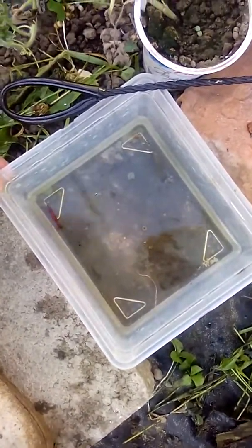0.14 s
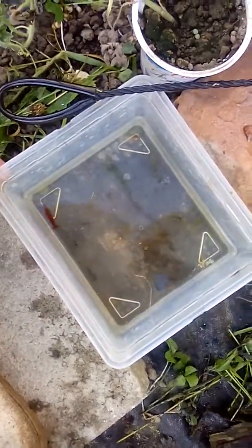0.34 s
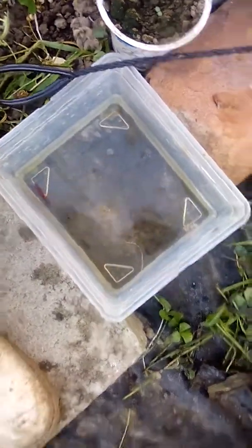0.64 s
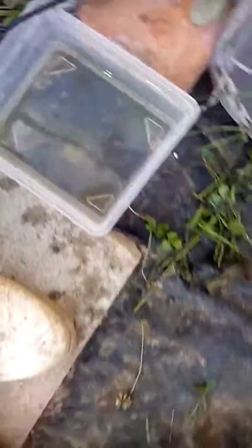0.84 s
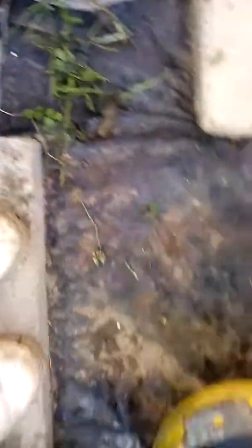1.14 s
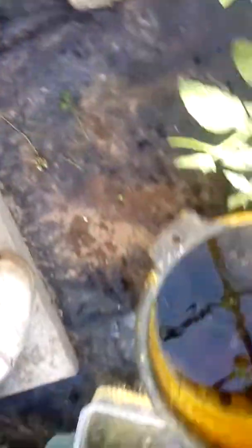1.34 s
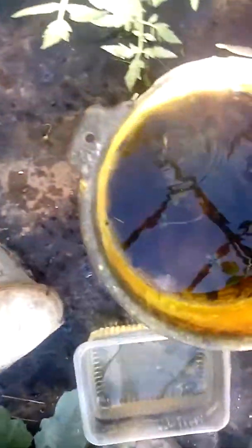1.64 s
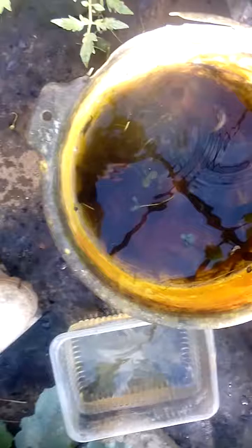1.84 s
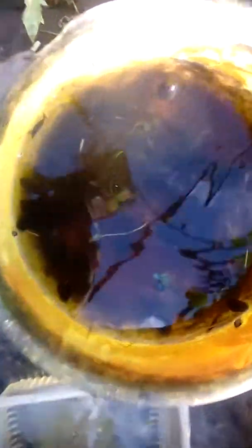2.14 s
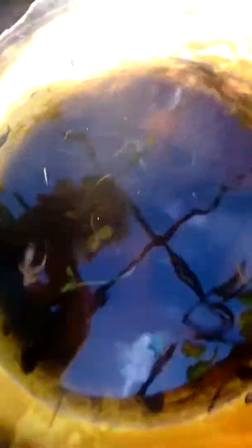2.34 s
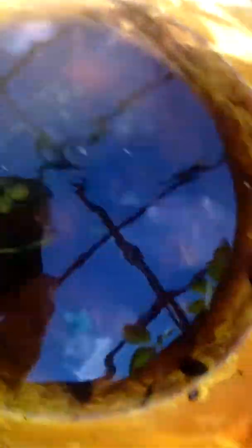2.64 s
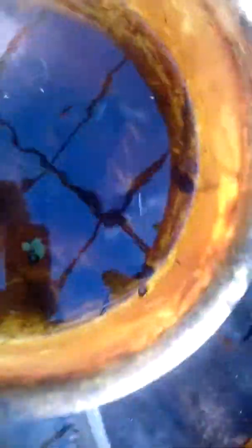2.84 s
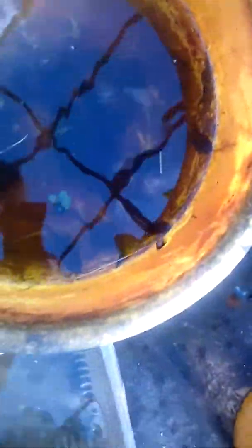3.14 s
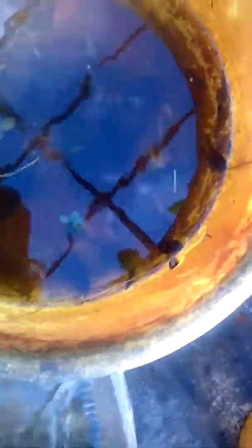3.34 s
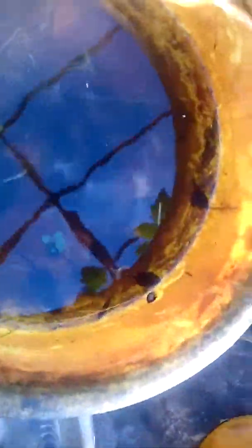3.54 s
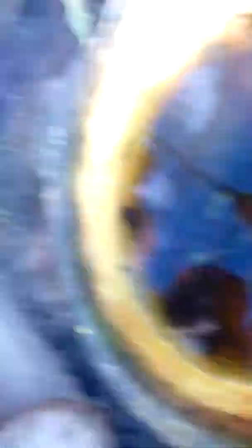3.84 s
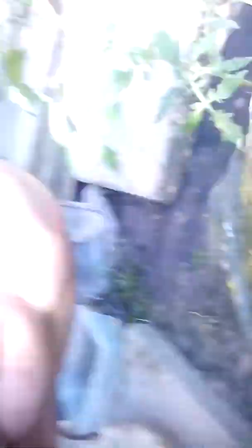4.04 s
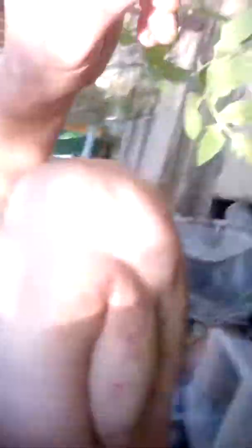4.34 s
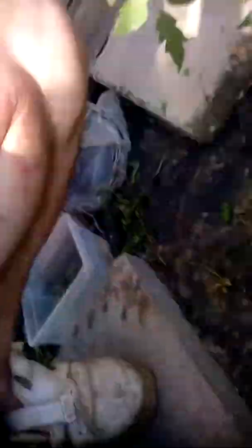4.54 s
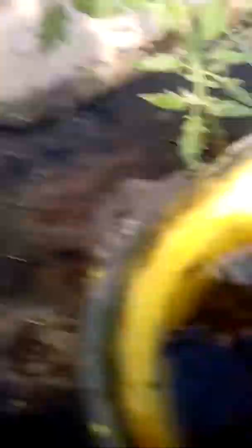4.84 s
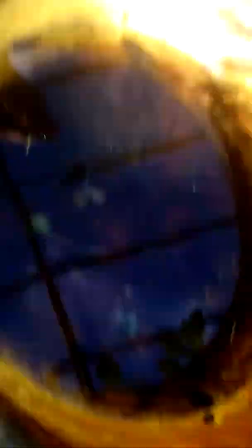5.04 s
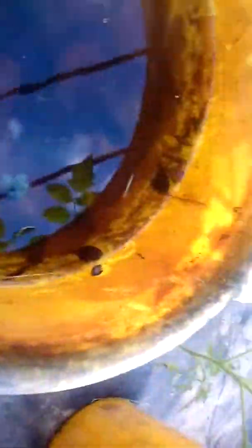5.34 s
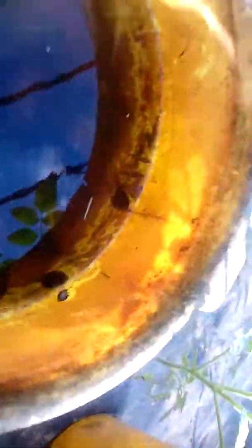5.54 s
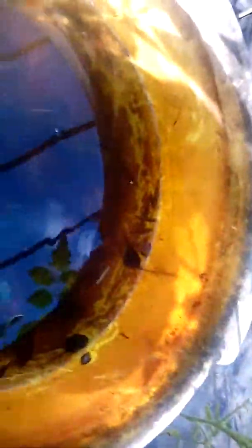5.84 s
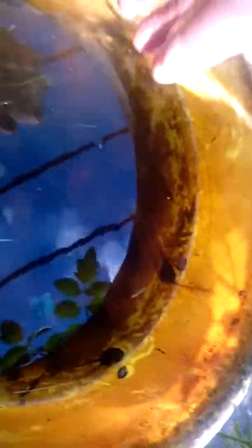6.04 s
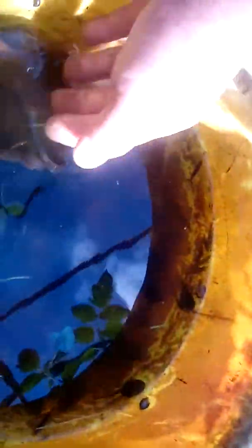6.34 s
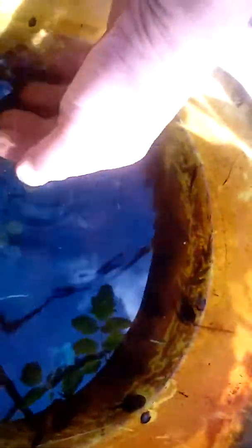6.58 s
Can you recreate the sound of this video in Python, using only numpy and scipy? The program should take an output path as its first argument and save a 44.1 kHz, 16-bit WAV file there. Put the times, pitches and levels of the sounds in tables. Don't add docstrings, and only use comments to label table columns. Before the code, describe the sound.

A quiet garden on a hand-held phone: very soft breeze rumble and distant road hiss. After about a second and a half, low handling thuds, plastic knocks and gritty scuffs begin. A single loud, dry plastic snap stands far above everything, followed by crunching grit and a brief hollow rubbed note. After a lull, another burst of grinding grit, then faint drags fade into the hushed air.

```python
import sys
import numpy as np
from scipy import signal
from scipy.fft import rfft, irfft, next_fast_len
from scipy.io import wavfile
from scipy.ndimage import uniform_filter1d, map_coordinates

SR = 44100
rng = np.random.default_rng(int(sys.argv[2]) if len(sys.argv) > 2 else 0)


def makeup_ratio(level_db):
    decades = np.asarray(level_db, float) / 20
    return 10 ** decades


def wrap_up_sound(samples):
    columns = np.atleast_2d(samples).T
    tamed = np.clip(columns, -1, 1)
    steps = np.round(tamed * 32767).astype(np.int16)
    wavfile.write(sys.argv[1], SR, steps)


N = 295911

# time_s, breeze_db, road_db
AIR_LEVELS = [(0, -65, -61.5), (.3, -64, -64.5), (.55, -64, -65.5), (.75, -65, -68.5), (1.0, -62.5, -65.5),
              (1.12, -66.5, -69), (1.45, -62.5, -73), (2.3, -64.5, -66.5), (2.7, -64, -76),
              (3.27, -67, -70.5), (3.5, -64.5, -74), (4.0, -62.5, -65.5), (4.7, -67.5, -68),
              (4.948, -63.5, -67), (5.3, -66, -73), (5.9, -65, -74.5), (6.3, -66, -74), (6.71, -64, -71)]
# freq_hz, density_db
BREEZE_SPECTRUM = [(15, -42), (25, -6), (112, 0.5), (233, -3.5), (297, -6), (419, -9.5), (518, -13.5),
                   (600, -12), (780, -50.5), (1320, -120)]
# freq_hz, density_db
ROAD_SPECTRUM = [(350, -48), (600, -16.5), (901, -4), (1020, -1), (1200, -5.5), (1360, -0.5), (1640, -2),
                 (2190, -8), (2800, -27), (3640, -55), (6160, -120)]
# freq_hz, density_db
HISS_SPECTRUM = [(240, -30.5), (400, -10), (488, -18.5), (653, -4.5), (1100, -13), (1970, -23),
                 (2360, -13.5), (5830, -14), (7920, -27.5), (15500, -33.5)]
# peak_s, level_db, swell_s, fade_s, centre_hz
GUST_STROKES = [(.35, -65, 0.11, 0.11, 69.6), (.43, -64, 0.16, 0.079, 337), (.55, -61.5, .12, 0.13, 98),
                (.7, -62.5, 0.16, 0.13, 348), (.87, -62, 0.096, 0.074, 129), (.92, -62, 0.16, 0.25, 289),
                (1.01, -59.5, 0.084, 0.083, 108), (1.33, -62.5, 0.064, 0.18, 100),
                (1.62, -52, 0.093, 0.11, 274), (1.75, -52.5, 0.12, 0.14, 145),
                (1.76, -52.5, 0.13, 0.13, 280), (1.88, -61, 0.09, 0.053, 89.6),
                (1.93, -57.5, 0.16, 0.14, 265), (2.25, -60, 0.1, 0.11, 110), (2.32, -64.5, 0.78, 0.35, 244),
                (2.9, -58, 0.16, 0.12, 340), (2.93, -55.5, 0.14, 0.18, 127), (3.08, -55.5, 0.09, 0.13, 184),
                (3.1, -57.5, 0.096, 0.098, 370), (3.2, -63, 0.087, 0.099, 131),
                (3.45, -65.5, .12, .15, 119), (3.5, -69.5, 0.46, 0.28, 335), (3.76, -59, 0.1, 0.096, 129.5),
                (3.8, -60, 0.069, .1, 50), (4.03, -61, 0.044, 0.056, 301), (4.16, -58.5, 0.21, 0.12, 120.3),
                (4.33, -57, .06, 0.28, 162), (4.44, -58, 0.15, 0.12, 142), (4.55, -56.5, 0.085, 0.1, 121),
                (4.55, -60, 0.32, 0.11, 394), (4.85, -64.5, 0.11, 0.14, 234), (4.92, -59, 0.16, 0.2, 77),
                (5.15, -61.5, 0.12, 0.077, 153), (5.35, -58.5, 0.12, 0.074, 156),
                (5.55, -62.5, 0.083, 0.21, 127.5), (5.87, -61, 0.18, 0.15, 140),
                (6.13, -69.5, 0.081, 0.1, 329.4), (6.5, -69.5, 0.3, 0.27, 90.2)]
# start_s, peak_db, swing_hz, t60_s
CASE_THUDS = [(1.5238, -32.5, 91, 0.075), (1.5538, -27, 87.3, 0.095), (1.571, -27.5, 84.5, 0.056),
              (1.6715, -37.5, 73, 0.093), (2.854, -40.5, 75, 0.11), (3.668, -52, 91, 0.093),
              (3.682, -44, 91, 0.052), (4.021, -39.5, 106, 0.027), (4.103, -47, 120, 0.021),
              (5.046, -50, 67, 0.064), (5.128, -49.5, 78.4, 0.055), (5.503, -52.5, 129, 0.088),
              (5.628, -52, 119, 0.067)]
# freq_hz, t60_s
YARD_DECAY = [(300, 0.16), (1500, 0.038), (5000, 0.065), (10000, 0.026)]
# freq_hz, gain_db
CAPSULE_RESPONSE = [(60, -34.5), (440, -1), (6800, -0.5), (7500, -18.5), (8200, -21), (15200, -37),
                    (15700, -90)]
# start_s, peak_db, ring_hz, t60_s, crack_db
PLASTIC_KNOCKS = [(1.521, -43.5, 1560, .0053, -18), (1.604, -41.5, 2080, 0.013, -11),
                  (1.6005, -38.5, 623, 0.01, -17.5), (1.709, -29.5, 612, 0.012, -25),
                  (1.75, -45, 502, 0.016, -20), (1.7849, -24, 2280, 0.0022, -21),
                  (1.7846, -29, 930, 0.003, -20), (1.8832, -31.5, 2300, 0.0031, -28),
                  (1.883, -45, 980, 0.0086, -30), (2.107, -32.5, 624, 0.023, -2),
                  (2.115, -44.5, 615, 0.0068, -12), (2.566, -48, 4620, .0036, -20),
                  (2.9129, -26, 3300, 0.0012, -22), (3.0721, -35, 970, 0.019, -17),
                  (3.126, -52, 4700, .006, -20), (3.656, -46, 2330, .015, -25),
                  (3.775, -51, 630, 0.0071, -25), (3.776, -48.5, 2680, 0.0036, -25),
                  (4.016, -39, 2350, 0.0071, -25), (3.657, -49.5, 1550, 0.014, -11),
                  (3.775, -36.5, 1657, 0.0087, -49), (4.406, -35, 660, 0.0061, -3),
                  (4.864, -42.5, 2920, 0.0041, -19), (4.932, -50, 2680, .006, -19),
                  (4.954, -47, 2300, .003, -8), (4.966, -41, 2210, 0.0016, -16),
                  (2.573, -52, 4470, 0.0035, -10), (2.58, -49, 4420, 0.0033, -14.5),
                  (2.615, -53, 5910, .004, -1), (4.3263, -40.5, 1330, .008, -20)]
# start_s, peak_db, ring_hz,
# crack_db, spark_db
STONE_POPS = [(1.959, -43, 5970, -9, -44), (1.958, -44, 1490, -8, -45), (2.107, -38, 5600, 4, -28),
              (2.114, -36, 5800, -2, -29), (2.761, -40, 4660, -30, -18), (2.872, -41, 4020, -12, -26),
              (2.952, -50, 6700, -3, -25), (3.036, -56, 6770, -5, -22), (3.073, -48, 6070, 1, -21),
              (3.406, -60, 2000, -1.5, -19.5), (4.3583, -37.5, 3190, -13.5, -35),
              (4.418, -33, 3000, 0, -35.5), (4.486, -39, 2980, -3, -23), (4.4986, -34, 3340, -5, -22),
              (5.222, -53, 6730, -7, -20), (5.583, -62, 4960, 3, -32), (2.096, -29, 795, -1, -28.5),
              (2.862, -46, 3000, -3, -23), (2.9, -37, 1230, -8, -32), (2.928, -27, 3630, -11.5, -37),
              (2.9795, -49, 3810, -5, -27), (2.999, -44.5, 3470, -1, -24), (3.101, -40, 3920, 1, -35),
              (4.016, -34.5, 1650, -8, -21), (4.185, -55, 1720, -1, -15), (4.294, -49, 3060, -12, -35),
              (4.3263, -32.5, 3050, -1.5, -24), (4.337, -34.5, 1870, -18, -37),
              (4.3695, -35.5, 3080, -17, -26), (4.4105, -28.5, 3200, -10, -31),
              (4.4207, -28.5, 2730, -7, -32), (4.421, -29, 4860, -10, -30), (4.495, -33, 4240, -12, -25),
              (4.502, -30.5, 4220, -9, -31), (4.523, -38, 2744, -17, -26), (4.536, -30.5, 2896, -12, -31)]
# start_s, peak_db
SNAP_BLOWS = [
    (2.76232, -4),
    (2.7645, -24),
    (2.7748, -26),
]
# mode_hz, level_db, t60_s
SHELL_MODES = [(1480, 0, .0021), (3500, -28, .005), (4180, -18, .003), (5140, -15.5, .0025),
               (5640, -19, .004), (6160, -17.5, .0025)]
# centre_s, level_db, half_length_s, first_hz, last_hz
GLIDE_STROKES = [(0.06, -62.5, .35, 1587, 1725), (0.09, -63, 0.2, 1410, 1280),
                 (0.378, -65.5, 0.28, 980, 1090), (0.374, -69, .2, 1920, 2100),
                 (0.553, -69, 0.19, 1640, 1570), (0.677, -70, 0.41, 1055, 1190),
                 (0.834, -67.5, 0.19, 1870, 2460), (0.996, -72.5, 0.2, 1690, 1590),
                 (0.987, -66.5, 0.078, 1140, 1080), (2.274, -71.5, 0.18, 980, 1050),
                 (2.373, -61, 0.043, 1180, 1000), (2.384, -77, 0.22, 2240, 2380),
                 (2.72, -68, .2, 1737, 1890), (3.47, -71.5, 0.093, 1750, 1700),
                 (3.673, -70, .18, 2150, 2280), (3.677, -66, 0.094, 1520, 1580),
                 (3.824, -68, .3, 2460, 2020), (3.97, -69, 0.084, 1010, 1110),
                 (4.09, -60.5, 0.12, 1490, 1670), (4.143, -80, 0.18, 2174, 1800),
                 (4.2, -71, 0.27, 1740, 1670), (4.197, -69, 0.2, 820, 815), (4.843, -68, 0.13, 1440, 1740),
                 (4.877, -69.5, 0.24, 890, 990), (4.942, -67, 0.13, 3070, 2650),
                 (5, -65.5, 0.14, 2270, 1850), (5.077, -64.5, 0.12, 780, 590), (5.142, -65, 0.11, 600, 790),
                 (5.29, -68, 0.097, 2340, 2190), (5.292, -69, 0.14, 1750, 1684),
                 (5.926, -72.5, 0.11, 2110, 2260), (2.426, -66, .09, 544, 504),
                 (2.53, -62, 0.081, 343, 326), (3.083, -54, 0.069, 441, 424),
                 (1.997, -44, 0.067, 1490, 1970), (3.642, -67, 0.032, 7300, 7900)]
# peak_s, level_db, swell_s,
# fade_s, note_hz
HOLLOW_STROKES = [
    (3.056, -52, .012, 0.095, 980),
    (3.08, -48, 0.032, 0.049, 977),
    (3.1095, -46, 0.047, 0.0062, 970),
    (5.076, -62, 0.17, 0.057, 7340),
    (2.113, -69.5, .03, .012, 14500),
    (4.497, -71, .02, .07, 14300),
    (5.585, -81, .04, .04, 12800),
    (2.875, -72, .015, .06, 8600),
]
# peak_s, level_db, swell_s, fade_s, low_resonance_hz
SOLE_TREADS = [(1.565, -49, 0.081, 0.088, 800), (1.605, -48, 0.014, 0.065, 636),
               (1.716, -44.5, 0.011, 0.049, 610), (1.775, -54.5, 0.11, 0.023, 604),
               (1.794, -50.5, 0.016, 0.17, 810), (1.882, -51.5, 0.043, 0.12, 970),
               (1.9605, -44, .004, 0.18, 720), (2.014, -40, 0.1, 0.17, 695),
               (2.113, -44, 0.058, 0.013, 640), (2.153, -46, 0.13, 0.061, 640),
               (2.745, -60.5, 0.15, 0.045, 940), (2.772, -47, 0.016, 0.14, 1070),
               (2.929, -45.5, 0.09, 0.078, 1100), (3.062, -47, 0.022, 0.14, 1000),
               (3.105, -47, 0.15, .014, 980), (4.03, -55, 0.12, 0.13, 1050),
               (4.326, -46, 0.008, 0.077, 1240), (4.385, -49, 0.076, 0.12, 764),
               (4.428, -44.5, 0.14, 0.16, 695), (4.5, -48, 0.13, 0.12, 760)]
# peak_s, level_db, swell_s, fade_s, high_resonance_hz
SOLE_DRAGS = [(1.406, -62, 0.13, 0.16, 1640), (1.66, -68, .05, 0.072, 1900),
              (2.57, -63.5, 0.014, 0.056, 1750), (3.2, -77, 0.13, .12, 1580),
              (3.657, -67, 0.022, 0.062, 2290), (3.93, -66, 0.15, 0.18, 1900), (4.15, -70, 0.57, 0.2, 1560),
              (4.86, -62, 0.14, 0.17, 1620), (4.95, -61.5, 0.18, 0.3, 1750), (5.3, -64.5, 0.2, 0.077, 2180),
              (5.588, -70.5, 0.094, 0.087, 1772), (5.92, -67, 0.24, 0.093, 2110),
              (6.55, -70.5, .12, 0.13, 1806)]
# peak_s, level_db, swell_s, fade_s, resonance_hz
GRIT_CRUNCHES = [(1.565, -59, 0.087, 0.047, 4970), (1.606, -57, 0.0063, 0.08, 4760),
                 (1.716, -58, .01, 0.16, 4890), (1.792, -60.5, 0.014, 0.062, 4700),
                 (1.89, -67.5, 0.056, 0.12, 5870), (1.96, -52, .004, 0.25, 5260),
                 (2.003, -48, .05, .1, 5200), (2.04, -41, 0.083, 0.08, 5700), (2.1, -46, .025, 0.068, 5670),
                 (2.114, -52, .03, .012, 5600), (2.154, -50.5, .08, 0.053, 5460),
                 (2.772, -54.5, .012, 0.12, 4360), (2.866, -57, .015, .1, 3790),
                 (2.926, -46.5, 0.071, 0.099, 3820), (3.01, -57.5, .1, 0.062, 3680),
                 (3.084, -51, 0.074, 0.1, 5430), (4.028, -66.5, .012, 0.26, 3910),
                 (4.305, -63, 0.035, 0.046, 3080), (4.34, -50.5, .04, 0.14, 3280),
                 (4.428, -45.5, 0.13, 0.12, 3720), (4.5, -44, 0.032, 0.084, 3960),
                 (4.6, -66, .1, 0.12, 3720)]
# peak_s, level_db, swell_s, fade_s, resonance_hz
GRIT_SWEEPS = [(1.43, -69, .1, 0.12, 3980), (2.568, -65, .012, 0.12, 4700), (2.67, -62, 0.088, 0.2, 5740),
               (3.2, -75, .1, 0.39, 4740), (3.66, -70.5, .04, 0.086, 5100), (4.19, -77, 0.16, .2, 4500),
               (4.868, -61.5, 0.007, 0.12, 2700), (4.96, -72, 0.12, 0.085, 3010),
               (4.93, -69.5, 0.18, .35, 6500), (5.092, -63.5, 0.18, 0.036, 7260),
               (5.252, -57.5, 0.11, 0.1, 7160), (5.308, -64, 0.039, 0.093, 6680),
               (5.588, -68, 0.041, 0.05, 4850), (5.93, -75, 0.1, 0.13, 4610)]
# peak_s, level_db, swell_s, fade_s
DUST_PUFFS = [(1.73, -72, .03, .015), (2.003, -64, 0.061, .1), (2.045, -54, 0.06, 0.059),
              (2.098, -68, .02, 0.12), (2.772, -80, .012, .06), (2.926, -63, 0.077, 0.045),
              (3.084, -70, 0.063, .06), (3.252, -80, 0.057, 0.022), (3.65, -70, 0.05, 0.027),
              (4.028, -78, .012, 0.1), (4.192, -73, .045, 0.073), (4.325, -72, 0.0091, .15),
              (4.428, -61.5, 0.12, 0.11), (4.5, -56, 0.036, 0.093), (4.87, -76.5, 0.12, .06),
              (4.93, -72, 0.22, 0.11), (5.08, -74, 0.28, .06), (5.252, -56, 0.088, 0.059),
              (5.308, -60, 0.036, 0.072), (5.588, -80.5, .04, 0.058), (5.93, -79.5, 0.22, 0.094)]
# freq_hz, density_db
DUST_SPECTRUM = [(4410, -23.5), (7500, 2), (8000, -8.5), (8900, -16), (11000, -8), (13100, -22.5),
                 (15500, -22.5)]

SOLE_LOW_HZ, SOLE_HIGH_HZ = 790, 1750
KNOCK_SPARK_DB, POP_T60_S = -56, 0.0039
STROKE_DB, STROKE_CURL = 20, 1.11


def unit(x):
    return x / np.sqrt(np.mean(np.abs(x) ** 2) + 1e-20)


def along(points, hz):
    f, v = np.transpose(points)
    return np.interp(np.log(hz + 1), np.log(f + 1), v)


def wobble(rate_hz):
    knots = rng.standard_normal(int(N * rate_hz / SR) + 4)
    return map_coordinates(knots, [np.arange(N) * rate_hz / SR])


def filtered(x, response):
    m = next_fast_len(N + SR // 2)
    return irfft(rfft(x, m) * response(np.fft.rfftfreq(m, 1 / SR)), m)[:N]


def patches(shape, bins, frames, patchy_db):
    rough = uniform_filter1d(rng.standard_normal(shape), bins, 0)
    return makeup_ratio(patchy_db * unit(uniform_filter1d(rough, frames, 1)))


def rush(spectrum, patchy_db):
    z = signal.stft(rng.standard_normal(N), SR, nperseg=1024)[2]
    z = z * patches(z.shape, bins=5, frames=12, patchy_db=patchy_db)
    x = signal.istft(z, nperseg=1024)[1][:N]
    return unit(filtered(x, lambda hz: makeup_ratio(along(spectrum, hz))))


def add(track, start_s, sound):
    part = track[round(start_s * SR):][:len(sound)]
    part += sound[:len(part)]


def ring(hz, t60_s, rise_cycles, t, order=1):
    rise = (1 - np.exp(-t * hz / rise_cycles)) ** order
    x = np.sin(2 * np.pi * hz * t) * makeup_ratio(-60 * t / t60_s) * rise
    return x / np.abs(x).max()


def hump(hz, centre_hz, octaves, db):
    return makeup_ratio(db) / (1 + (np.log2(hz / centre_hz) / octaves) ** 2)


def strokes(rows, t):
    peak_s, level_db, swell_s, fade_s = np.array(rows).T[:4, :, None]
    away = np.maximum((peak_s - t) / swell_s, (t - peak_s) / fade_s)
    return makeup_ratio(level_db - STROKE_DB * away ** STROKE_CURL) + 1e-9


def together(gains):
    return np.sqrt(np.sum(gains ** 2, axis=0))


def sliding(gains_of, notes_of, octaves, size):
    overlap = size * 3 // 4
    hz, t, z = signal.stft(rng.standard_normal(N), SR, nperseg=size, noverlap=overlap)
    hz = hz[:, None] + 1
    power = np.zeros(z.shape)
    for gain, note_hz in zip(gains_of(t), notes_of(t)):
        near = gain > 1e-6
        shape = hump(hz, note_hz[near], octaves, 0) ** 4
        power[:, near] += shape / shape.mean(0) * gain[near] ** 2
    broken = patches(z.shape, bins=4, frames=6, patchy_db=2.5)
    return signal.istft(z * np.sqrt(power) * broken, SR, nperseg=size, noverlap=overlap)[1][:N]


def garden():
    time_s, breeze_db, road_db = np.transpose(AIR_LEVELS)
    t = np.arange(N) / SR
    breeze_gain = makeup_ratio(np.interp(t, time_s, breeze_db) - 1.5 + 1.2 * wobble(8.1))
    road_gain = makeup_ratio(np.interp(t, time_s, road_db) - 1.5 + 1.3 * wobble(6))
    hiss_gain = makeup_ratio(-73 + wobble(5.4))
    breeze = breeze_gain * rush(BREEZE_SPECTRUM, patchy_db=2.5)
    road = road_gain * rush(ROAD_SPECTRUM, patchy_db=2.2)
    return breeze + road + hiss_gain * rush(HISS_SPECTRUM, patchy_db=1.2)


def gusts():
    def centres_of(t):
        return [row[4] + 0 * t for row in GUST_STROKES]
    return sliding(lambda t: strokes(GUST_STROKES, t), centres_of, octaves=.7, size=2048)


def thuds():
    out, t = np.zeros(N), np.arange(SR // 5) / SR
    for start_s, peak_db, hz, t60_s in CASE_THUDS:
        add(out, start_s, makeup_ratio(peak_db) * ring(hz, t60_s, 0.19, t))
    return out


def glides():
    rows = [(s, db, half_s, half_s) for s, db, half_s, *_ in GLIDE_STROKES]

    def notes_of(t):
        return [np.interp(t, [s - half_s, s + half_s], [first_hz, last_hz])
                for s, _, half_s, first_hz, last_hz in GLIDE_STROKES]
    return sliding(lambda t: strokes(rows, t), notes_of, octaves=.12, size=1024)


def hollows():
    out = np.zeros(N)
    for row, gain in zip(HOLLOW_STROKES, strokes(HOLLOW_STROKES, np.arange(N) / SR)):
        noise = rng.standard_normal(N)
        out += gain * unit(filtered(noise, lambda hz: hump(hz + 1, row[4], .15, 0) ** 2))
    return out


def yard(x):
    hz, t, z = signal.stft(rng.standard_normal(SR // 3), SR, nperseg=256)
    decay = makeup_ratio(-60 * t / along(YARD_DECAY, hz)[:, None])
    tail = signal.istft(z * decay, SR, nperseg=256)[1]
    return signal.fftconvolve(np.pad(x, (70, 0)), tail / np.linalg.norm(tail))[:N]


def ticks():
    out, sparks, t = np.zeros(N), np.zeros(N), np.arange(SR // 20) / SR
    contacts = [(s, db, hz, crack_db, KNOCK_SPARK_DB, t60_s) for s, db, hz, t60_s, crack_db in PLASTIC_KNOCKS]
    contacts += [(*row, POP_T60_S) for row in STONE_POPS]
    for start_s, peak_db, hz, crack_db, spark_db, t60_s in contacts:
        crack, spark = rng.standard_normal((2, len(t))) * makeup_ratio(-60 * t / 0.0099)
        crack = signal.lfilter([1, -.8], [1], crack)
        swing = rng.choice([-1, 1]) * ring(hz, t60_s, 1.37, t, order=2)
        add(out, start_s + .0014, makeup_ratio(peak_db) * (swing + makeup_ratio(crack_db + 5.5) * crack))
        add(sparks, start_s + .0026, makeup_ratio(peak_db + spark_db + 11) * spark * makeup_ratio(-60 * t / .02))
    return out, filtered(sparks, lambda hz: makeup_ratio(along(DUST_SPECTRUM, hz) + 9.5))


def snap():
    out, t = np.zeros(N), np.arange(SR // 20) / SR
    release = np.minimum(t / .0005, 1)
    modes = sum(makeup_ratio(db) * ring(hz, t60_s, 3.5, t) for hz, db, t60_s in SHELL_MODES)
    blow = -release * modes
    blow = blow / np.abs(blow).max()
    for start_s, peak_db in SNAP_BLOWS:
        add(out, start_s, makeup_ratio(peak_db) * blow)
    return out


def crunch(grains_per_s, spread_db, rub):
    hit, size = rng.random((2, N))
    grains = (hit < grains_per_s / SR) * makeup_ratio(spread_db * size ** 3)
    flutter = signal.lfilter([1], [1, -np.exp(-1 / (0.0008 * SR))], grains)
    return unit((rub + unit(flutter)) * rng.standard_normal(N))


def lead(gains, values):
    return np.array(values) @ gains ** 2 / np.sum(gains ** 2, axis=0)


def band(hz, low_hz, high_hz):
    return 1 / np.sqrt((1 + (low_hz / hz) ** 12) * (1 + (hz / high_hz) ** 8))


def resonance_lift_db(gains):
    return np.clip(-.45 * (20 * np.log10(together(gains)) + 40), 3, 13)


def scuffs():
    layers = [crunch(500, spread_db=9, rub=2.0),
              crunch(700, spread_db=11, rub=1.9),
              crunch(340, spread_db=7.5, rub=2.4)]
    hz, t, z = signal.stft(np.array(layers), SR, nperseg=512, noverlap=416)
    hz = hz[:, None] + 1
    grit_rows = GRIT_CRUNCHES + GRIT_SWEEPS
    sole = strokes(SOLE_TREADS + SOLE_DRAGS, t)
    grit = strokes(grit_rows, t)
    dust = strokes(DUST_PUFFS, t)
    treads, drags = len(SOLE_TREADS), len(SOLE_DRAGS)
    low_hz = lead(sole, [r[4] for r in SOLE_TREADS] + [SOLE_LOW_HZ] * drags)
    high_hz = lead(sole, [SOLE_HIGH_HZ] * treads + [r[4] for r in SOLE_DRAGS])
    grit_hz = lead(grit, [r[4] for r in grit_rows])
    drag = lead(sole, [0] * treads + [1] * drags)
    sole_lift_db, grit_lift_db = resonance_lift_db(sole), resonance_lift_db(grit)

    low_hump = hump(hz, low_hz, 0.27, sole_lift_db + 1.5 - 10 * drag)
    high_hump = hump(hz, high_hz, 0.2 - 0.027 * drag, sole_lift_db - 1.5 + 7 * drag)
    sole_shape = band(hz, 510, 2500) * (1 + low_hump + high_hump)
    grit_shape = band(hz, 2400, 8100) * makeup_ratio(along(CAPSULE_RESPONSE, hz))
    grit_shape = grit_shape * (1 + hump(hz, grit_hz, 0.36, grit_lift_db + .1))
    dust_shape = makeup_ratio(along(DUST_SPECTRUM, hz)) + 0 * t

    out, now = np.zeros(N), np.arange(N) / SR
    for noise, shape, gains in zip(z, (sole_shape, grit_shape, dust_shape), (sole, grit, dust)):
        shape = shape * patches(shape.shape, bins=2, frames=22, patchy_db=3.2)
        shape = shape / np.sqrt(np.mean(shape ** 2, axis=0))
        layer = signal.istft(noise * shape, SR, nperseg=512, noverlap=416)[1][:N]
        out += layer * np.interp(now, t, together(gains))
    return out


def scene():
    background = garden() + gusts() + thuds()
    small, sparks = ticks()
    big = snap()
    hard = small + big + makeup_ratio(-11) * yard(small) + makeup_ratio(-17.5) * yard(big)
    hard = filtered(hard, lambda hz: makeup_ratio(along(CAPSULE_RESPONSE, hz)))
    return (background + glides() + hollows() + hard + sparks + scuffs())[None]


def low_pass(x):
    return signal.sosfilt(signal.butter(12, 15690, fs=SR, output="sos"), x)


def record(dry):
    return low_pass(dry)


dry = scene()
out = record(dry)
wrap_up_sound(out)
```